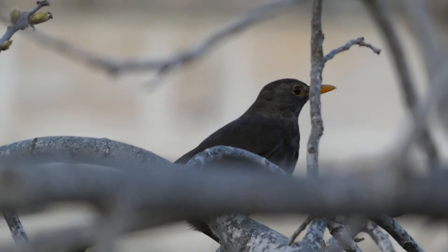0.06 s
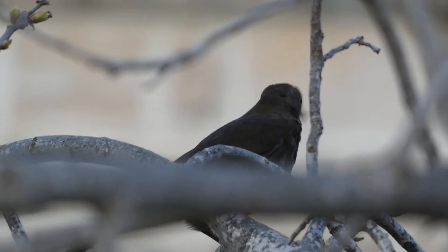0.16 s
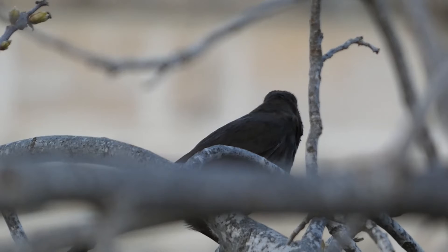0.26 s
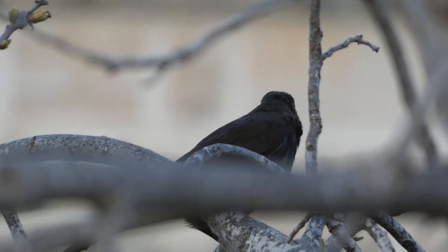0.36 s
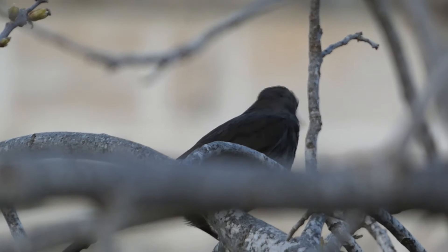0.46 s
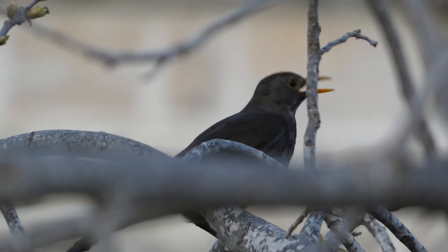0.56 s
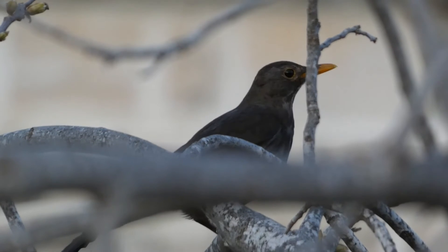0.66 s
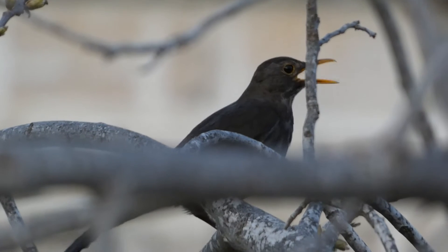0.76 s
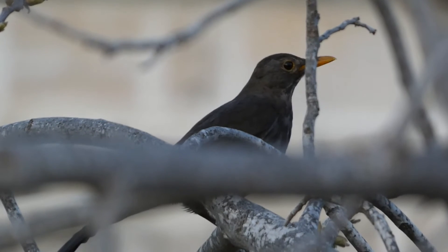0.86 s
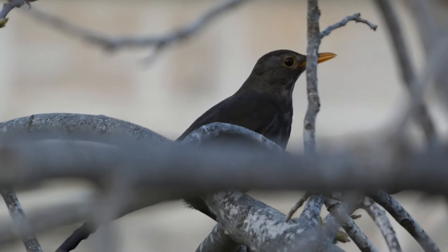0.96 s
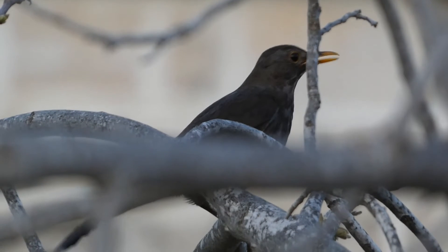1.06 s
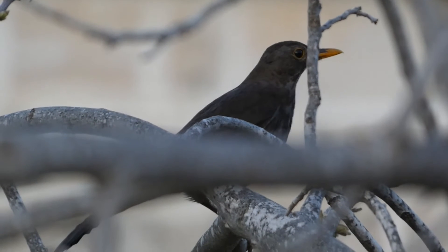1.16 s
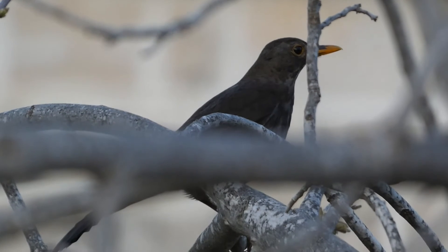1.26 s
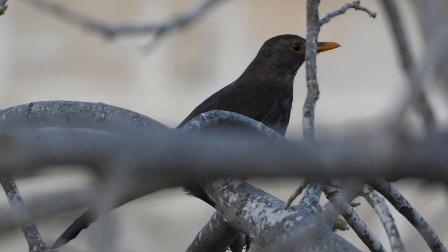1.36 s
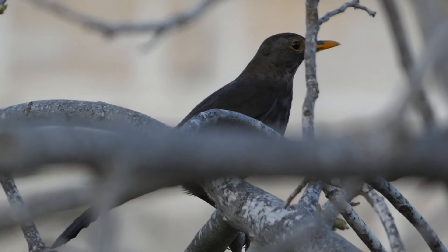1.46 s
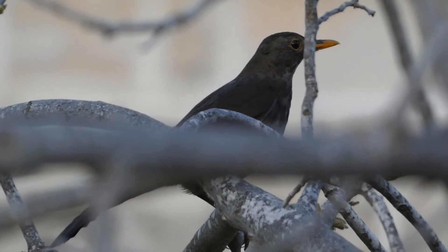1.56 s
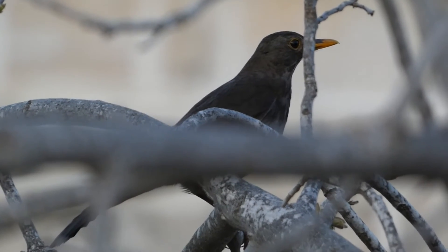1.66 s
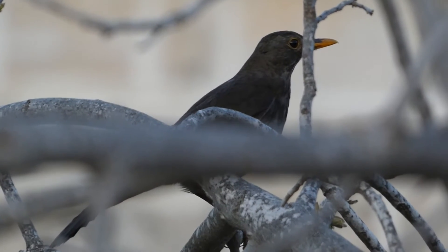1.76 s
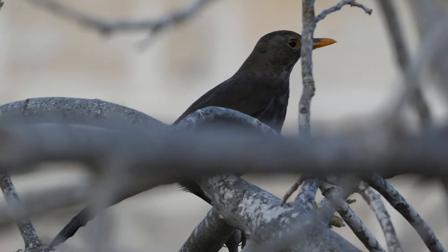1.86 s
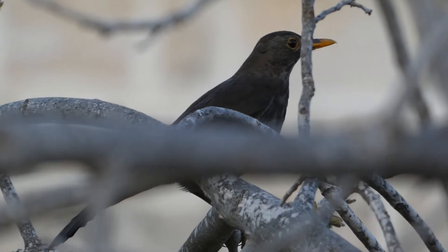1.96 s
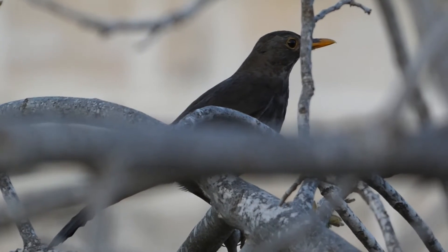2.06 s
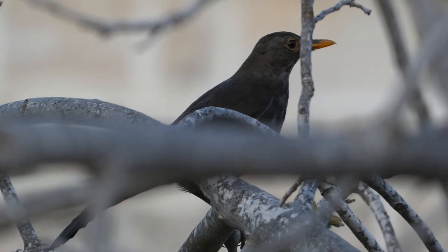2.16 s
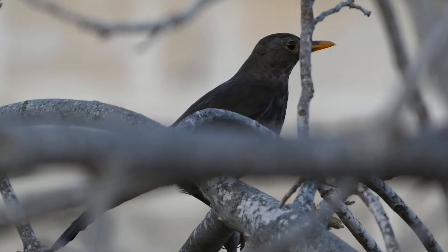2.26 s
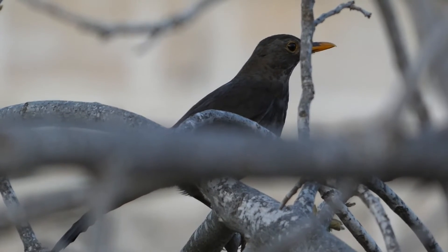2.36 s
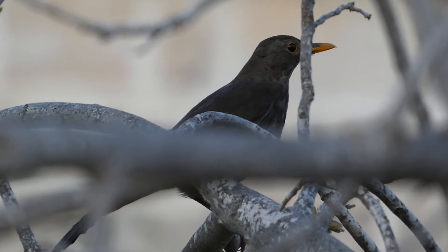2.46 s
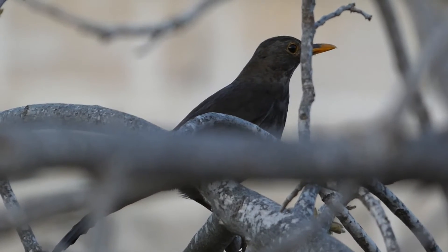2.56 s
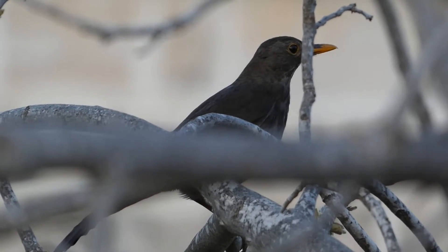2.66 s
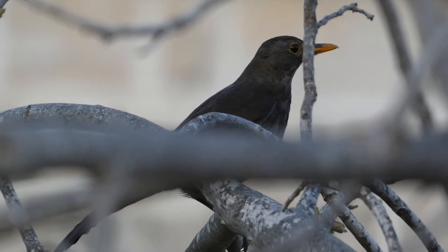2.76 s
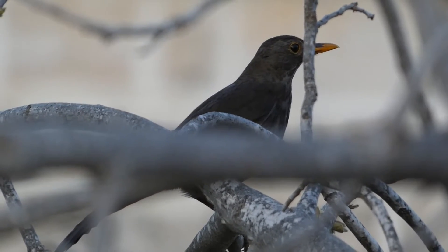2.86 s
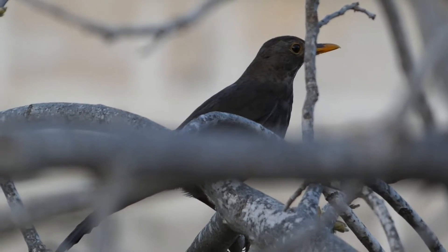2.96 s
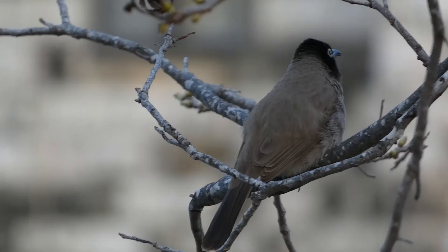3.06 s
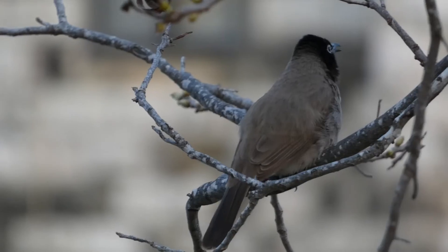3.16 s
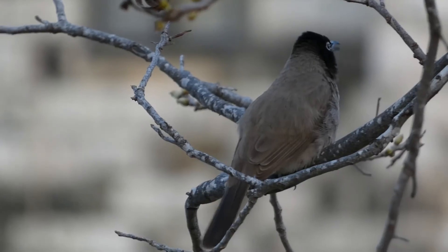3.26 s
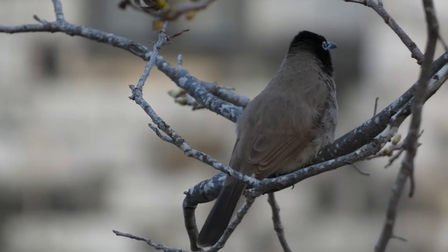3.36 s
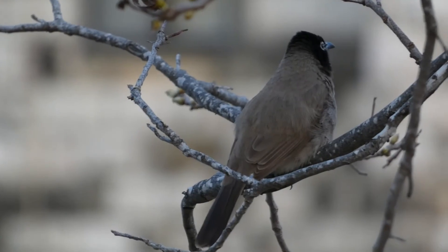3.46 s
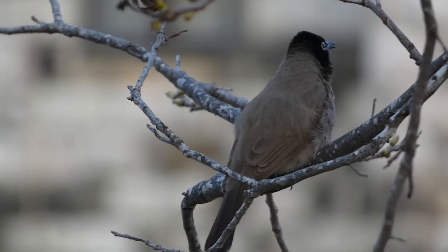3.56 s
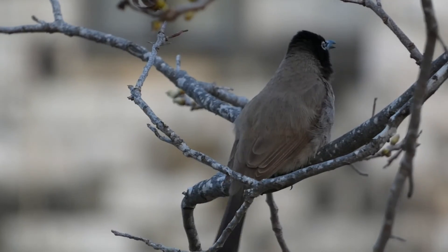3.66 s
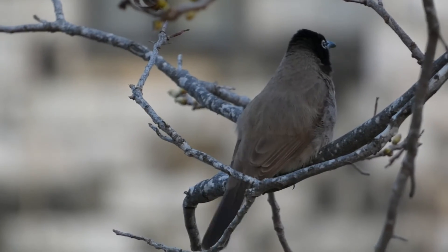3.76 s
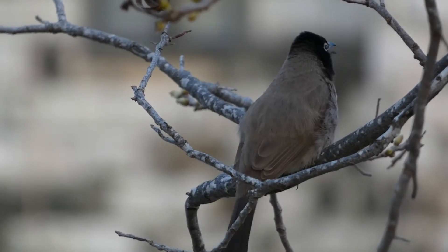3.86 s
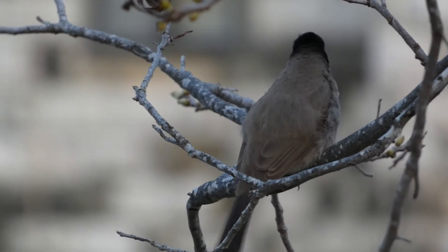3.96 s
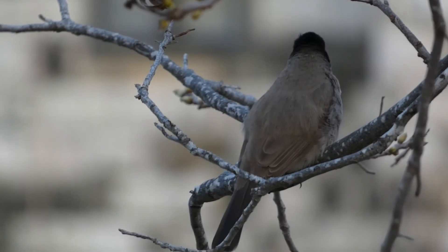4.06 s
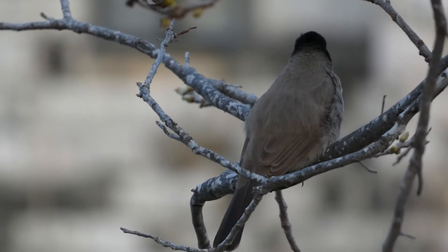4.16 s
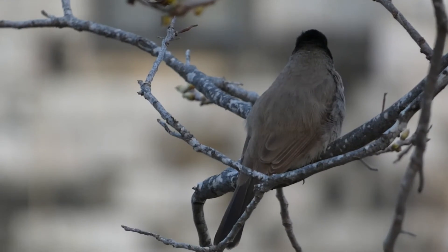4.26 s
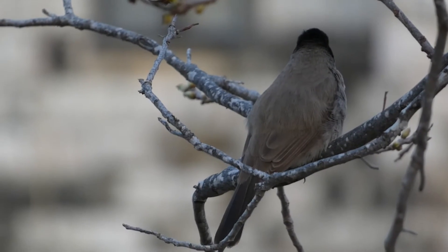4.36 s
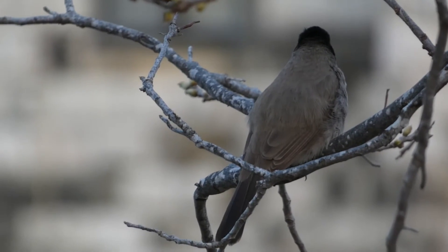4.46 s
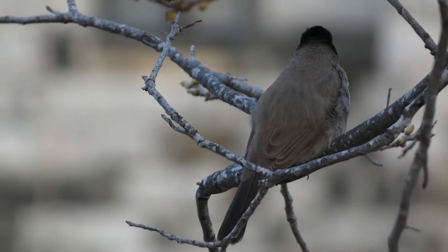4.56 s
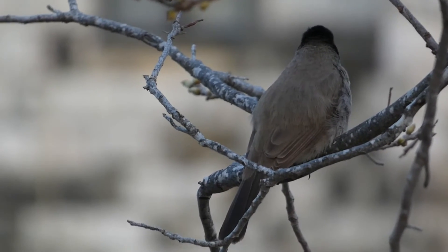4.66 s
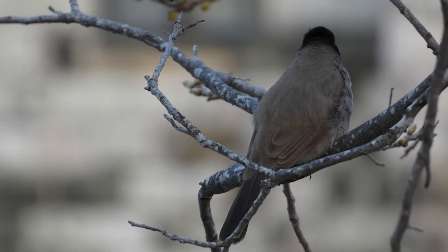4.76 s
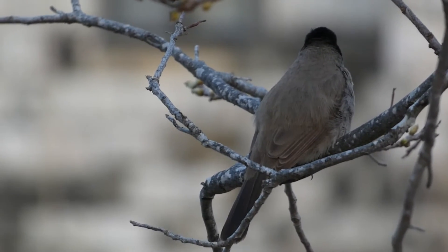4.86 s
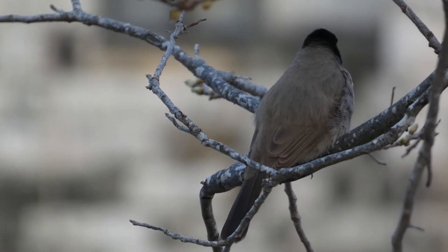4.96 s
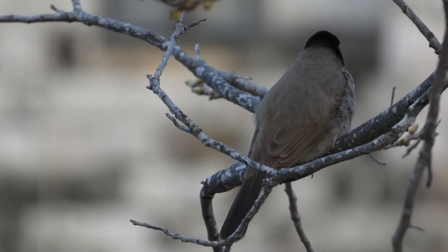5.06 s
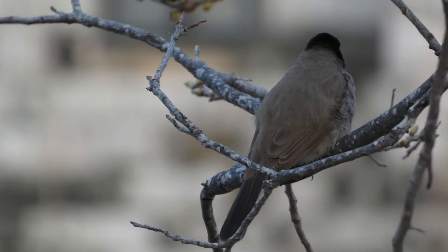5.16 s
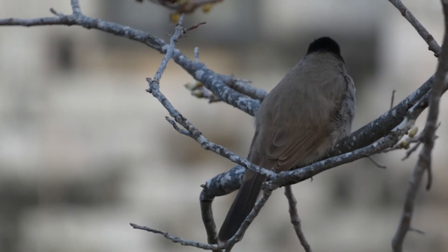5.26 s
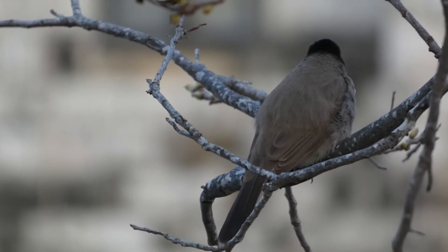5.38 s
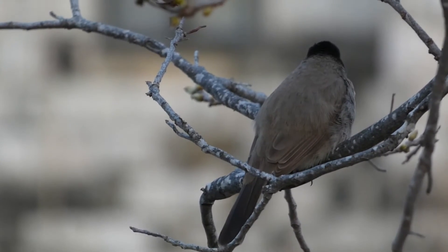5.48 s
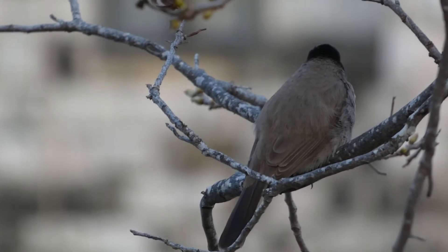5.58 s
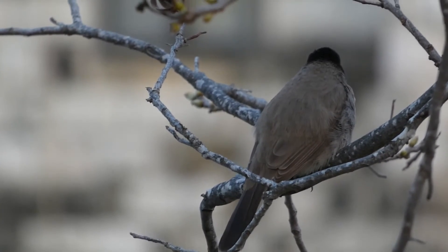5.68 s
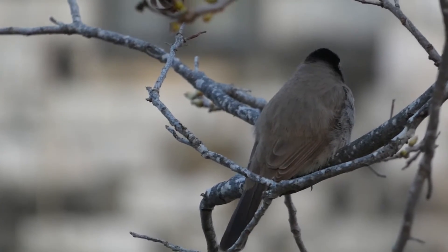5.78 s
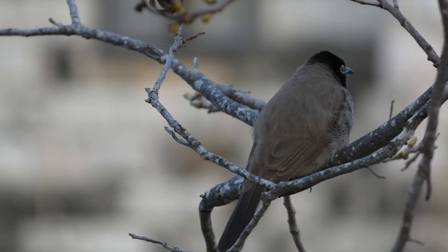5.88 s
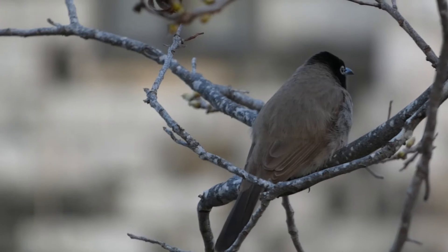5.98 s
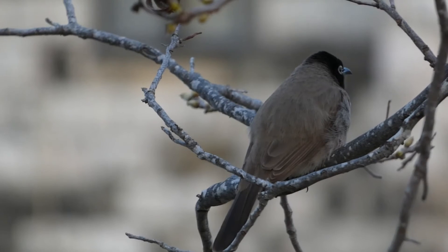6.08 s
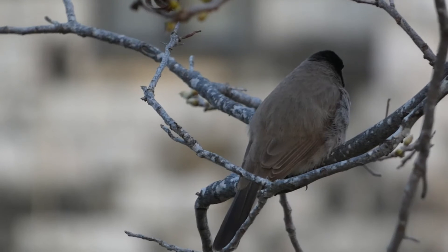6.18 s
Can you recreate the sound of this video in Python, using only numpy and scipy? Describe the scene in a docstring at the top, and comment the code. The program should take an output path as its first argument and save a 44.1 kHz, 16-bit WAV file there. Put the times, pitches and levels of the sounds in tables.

```python
"""Bare trees between stone houses. A blackbird gives three sharp two-voiced calls, then a bulbul sings three
fluty, trilled syllables; sparrows chirp and small birds whistle further off, over hiss and distant traffic.
Voices are rotating phasors shaken by smooth noise, with overtones from their powers and products.
Noise impulse responses echo the birds off the walls; air and road are shaped noise, the engine a shaken tone."""
import sys
import numpy as np
from scipy import signal
from scipy.fft import rfft, irfft
from scipy.io import wavfile
from scipy.ndimage import map_coordinates

SR = 44100
rng = np.random.default_rng(int(sys.argv[2]) if len(sys.argv) > 2 else 0)


def to_wav(sig):
    """Store sig (one row per channel, or 1-D mono) as 16-bit WAV at the path in sys.argv[1].

    Samples outside -1..1 are clipped; the rate is SR.
    """
    pcm = np.clip(np.atleast_2d(sig), -1, 1) * 32767
    pcm = np.round(pcm).astype(np.int16)
    wavfile.write(sys.argv[1], SR, pcm.T)  # frames by channels


N = 274302
T = np.arange(N) / SR


def undb(db):
    """Decibels to amplitude gain."""
    return 10 ** (np.asarray(db) / 20)


def unit(x):
    """Scale to rms 1."""
    return x / np.sqrt(np.mean(x ** 2))


def curves(rows, x):
    """Join each later column of a table by straight lines along its first column."""
    at, *columns = np.transpose(rows)
    return [np.interp(x, at, column) for column in columns]


def colour(points):
    """Gain at every FFT frequency from (Hz, dB) points, linear in dB over log frequency."""
    hz, db = np.transpose(points)
    bins_hz = np.fft.rfftfreq(N, 1 / SR)
    return undb(np.interp(np.log(bins_hz + 1), np.log(hz), db))


def apply_colour(x, points):
    """Zero-phase filter through (Hz, dB) points."""
    return irfft(rfft(x) * colour(points), N)


def noise(points):
    """Gaussian noise with a spectrum of (Hz, dB) points, rms 1."""
    return unit(apply_colour(rng.standard_normal(N), points))


def wander(points_per_s, size):
    """Smooth random motion with a spread near 1: a spline over random points."""
    at = np.arange(size) * points_per_s / SR
    return map_coordinates(rng.standard_normal(int(at[-1]) + 2), [at], order=2, mode="nearest")


def bell(t_s, spread_s):
    """Gaussian pulse with peak 1."""
    return np.exp(-.5 * (t_s / spread_s) ** 2)


def span(rows):
    """Sample numbers of a note and a gate that opens in 2 ms and closes in 6 ms."""
    times_s = np.transpose(rows)[0]
    first = max(int(times_s.min() * SR), 0)
    i = np.arange(first, min(int((times_s.max() + .003) * SR), N))
    edge = np.minimum((i - i[0]) / .002, (i[-1] - i) / .006) / SR
    return i, np.sin(np.pi / 2 * np.minimum(edge, 1)) ** 2


def rough_phasor(hz, rasp, rasp_hz=1300, waver=0.0043):
    """One vibrating source as a rotating phasor; waver unsteadies its pitch, rasp its size and phase."""
    size = len(hz)
    phase = 2 * np.pi * np.cumsum(hz * (1 + waver * wander(303.5, size))) / SR
    shake = (wander(rasp_hz, size) + 1j * wander(rasp_hz, size)) / np.sqrt(2)
    return np.exp(1j * phase) * (1 + rasp * shake) / np.sqrt(1 + rasp ** 2)


def add(out, rows, rasp, octave_db):
    """Add a whistled note of (s, Hz, dB) rows; squaring its phasor gives the octave."""
    i, gate = span(rows)
    hz, db = curves(rows, T[i])
    z = rough_phasor(hz, rasp)
    out[i] += np.sqrt(2) * gate * undb(db) * (z + undb(octave_db) * z ** 2)


def slurs(rows, rasp, edge_db, bend=0., waver=.004):
    """Notes that slide in pitch, swell and fade; bend arches the slide, waver unsteadies it."""
    out = np.zeros(N, complex)
    u = np.linspace(-1, 1)
    for start_s, length_s, start_hz, end_hz, db in rows:
        hz = start_hz + (end_hz - start_hz) * ((u + 1) / 2 + bend * (1 - u ** 2))
        hz = hz * (1 + waver * rng.standard_normal(len(u)))
        add(out, np.transpose([start_s + length_s * (u + 1) / 2, hz, db + edge_db * u ** 2]), rasp, -40)
    return out.real


def yard(x, tail_db, flutter_db, t60_s=1.0, flutter_t60_s=0.32, treble_hz=6500, treble_t60_s=0.3):
    """Direct sound, wall echoes, a quick scatter from the branches and a longer tail between the houses."""
    # Echoes from the nearest walls. Each row: delay in seconds, level in dB.
    walls = [(0.0134, -12.5), (.021, -20.5), (.039, -22), (.053, -22), (.098, -28)]
    t = T[:SR]
    width = .3

    def decay(t60):
        envelope = np.exp(-np.log(1000) * t / t60) * np.clip(t / 0.01 - .5, 0, 1)
        return unit(envelope) / np.sqrt(SR)

    envelope = np.hypot(undb(tail_db) * decay(t60_s), undb(flutter_db) * decay(flutter_t60_s))
    echoes = rng.standard_normal((2, SR)) * envelope
    for delay_s, db in walls:
        echoes[0, int(delay_s * SR)] += undb(db)
    # air soaks up the treble along the longer paths
    dull = signal.sosfiltfilt(signal.butter(2, treble_hz, fs=SR, output="sos"), echoes)
    mid, side = dull + (echoes - dull) * np.exp(-np.log(1000) * t / treble_t60_s)
    mid[0] += 1  # direct sound
    return np.array([signal.fftconvolve(x, mid + sign * width * side)[:N] for sign in (1, -1)])


def air(level_db=-56.5):
    """Low town rumble and soft hiss: shaped noise, partly alike in both ears."""
    # Outdoor air spectrum. Each row: frequency in Hz, relative density in dB.
    air_spectrum = [(15, -56), (25, -21), (113, 1), (204, -1), (267, -3), (349, -7.5), (433, -8), (614, -9),
                    (826, -9.5), (1710, -17.5), (2850, -18.5), (4380, -21.5), (6050, -24), (9050, -27.5),
                    (15500, -25)]
    # Likeness of the two ears. Each row: frequency in Hz, side minus mid in dB.
    side_gain = [(30, 2), (60, -7.5), (250, -2), (500, -1), (1500, 2), (4000, 9), (12000, -2)]
    # Slow change of the town's loudness. Each row: time in seconds, gain in dB.
    town_swell = [(0, 0), (3.0, 0), (3.3, 1.5), (4.5, 1), (6.2, 0.5)]
    mid = noise(air_spectrum)
    side = apply_colour(noise(air_spectrum), side_gain)
    return np.array([mid + side, mid - side]) * undb(level_db + curves(town_swell, T)[0])


def traffic(rumble_gain_db=-1, width=0.16, drone_hz=255.6):
    """A far engine, a randomly shaken tone, drones in swells over a rumble of road noise."""
    # Engine swells. Each row: peak time in seconds, Gaussian spread in seconds, peak level in dB.
    drone_swells = [(1.32, 0.024, -53), (3.45, .04, -58), (4.68, 0.081, -48), (5.013, 0.028, -50.5),
                    (5.498, 0.12, -51), (5.807, .035, -51)]
    # Road rumble. Each row: time in seconds, level in dB ahead of rumble_gain_db.
    rumble = [(0, -77), (3.0, -78), (3.4, -62), (4.45, -56.5), (4.56, -51.5), (4.8, -56), (6.22, -58)]
    swell = sum(undb(db) * bell(T - peak_s, spread_s) for peak_s, spread_s, db in drone_swells)
    drone = np.sqrt(2) * rough_phasor(np.full(N, drone_hz), 0.71, rasp_hz=34.8).real * swell
    road = [(100, -49), (220, -1.0), (370, 1.5), (470, -1), (600, -20.5), (1200, -12.5), (2500, -27.5),
            (6000, -54.5)]
    mid, side = noise(road), width * noise(road)
    return drone + undb(curves(rumble, T)[0] + rumble_gain_db) * np.array([mid + side, mid - side])


def chatter(count=420, centre_hz=3750, spread=.18, slur=.12, length_s=.04, scatter_db=2, edge_db=-9):
    """Sparrows in the far hedges: many faint slurred chips at random times and pitches blur into a wash."""
    # Level of the wash. Each row: time in seconds, level in dB.
    wash_level = [(0, -64), (1.8, -64.5), (2.5, -73), (3.1, -70.5), (3.6, -66), (4.9, -62.5), (6.22, -66)]
    out = np.zeros(N, complex)
    starts_s = (np.arange(count) + rng.random(count)) / count * (T[-1] - length_s)
    draws = np.clip(rng.standard_normal((count, 4)), -2, 2)
    for start_s, (pitch, rise, fall, size) in zip(starts_s, draws):
        hz, db = centre_hz * np.exp(spread * pitch), scatter_db * size
        chip = [(start_s, hz * np.exp(slur * rise), db + edge_db),
                (start_s + length_s / 2, hz, db),
                (start_s + length_s, hz * np.exp(slur * fall), db + edge_db)]
        add(out, chip, .9, -40)
    return unit(out.real) * undb(curves(wash_level, T)[0])


def far_whistles():
    """Thin, slightly wavering whistles from further trees: slow pitch slides."""
    # Each row: start in seconds, length in seconds, start pitch in Hz, end pitch in Hz, peak level in dB.
    whistles = [(1.455, .05, 6430, 6350, -64), (3.05, .11, 5240, 5650, -62.5), (3.78, .14, 5000, 5750, -67),
                (3.79, 0.082, 4060, 4050, -57), (3.88, 0.16, 6190, 6170, -61.5),
                (4.08, 0.091, 4030, 3980, -53.5), (4.17, 0.13, 6090, 6100, -59.5),
                (4.23, .18, 2910, 2450, -64), (4.385, 0.1, 5020, 4995, -59.5), (4.46, .2, 3255, 3140, -58),
                (4.82, .16, 8060, 7970, -65), (5.06, .17, 7970, 7920, -60), (5.45, .13, 5700, 5585, -65.5)]
    return slurs(whistles, rasp=.12, edge_db=-4.5)


def far_chips():
    """Short husky chips from further trees: arched slides, strongly shaken."""
    # Each row: start in seconds, length in seconds, start pitch in Hz, end pitch in Hz, peak level in dB.
    chips = [(.22, .062, 9300, 8850, -68), (.779, .02, 5150, 5700, -54.5),
             (1.261, 0.026, 5480, 5750, -53.5), (1.657, .025, 5500, 6050, -58),
             (1.745, .035, 5100, 5700, -59), (2.705, 0.05, 2900, 3290, -58), (2.722, .035, 3880, 4020, -59),
             (2.885, .04, 3550, 3350, -60), (3.865, 0.055, 3610, 4090, -55), (4.285, .022, 6000, 5300, -57),
             (4.548, .13, 5270, 5700, -63.5), (4.6, .13, 3050, 2204, -65), (4.68, 0.057, 5660, 4900, -56),
             (4.87, .058, 5090, 4970, -62), (5.405, 0.038, 3620, 3525, -57), (5.458, .023, 4220, 3270, -56),
             (5.505, .026, 4045, 3684, -51.5), (5.542, 0.0155, 3610, 3960, -55),
             (5.802, .024, 3565, 2890, -58)]
    return slurs(chips, rasp=.45, edge_db=-4.5, bend=.15)


def cheeps(rasp=1.0, rise_s=.008, fall_s=.02, length_s=0.076, base_hz=3280, fade_db=-5.5):
    """Far sparrows' hoarse cheeps leap to their top and sink back as they fade."""
    # Each row: time of the top in seconds, top pitch in Hz, level at the top in dB.
    cheep_tops = [(4.151, 5300, -47.5), (5.138, 5230, -52), (5.933, 5000, -49)]
    out = np.zeros(N, complex)
    t = np.linspace(-rise_s, length_s)
    for top_s, top_hz, db in cheep_tops:
        hz = base_hz + (top_hz - base_hz) * np.exp(-abs(t) / np.where(t < 0, rise_s, fall_s))
        add(out, np.transpose([top_s + t, hz, db + fade_db * t / length_s]), rasp, -40)
    return out.real


def pips(first_s=5.652, gap_s=.1, length_s=.022, start_hz=6220, end_hz=5920, first_db=-55, step_db=-.9):
    """A small bird's even run of six falling pips, each fainter than the last."""
    rows = [(first_s + k * gap_s, length_s, start_hz, end_hz, first_db + k * step_db) for k in range(6)]
    return slurs(rows, rasp=.2, edge_db=-3)


def near_sparrows(rasp=0.14, octave_db=-29):
    """Sparrows on the nearby branches: a held note swells, dips, flicks up and falls away."""
    # Each row: dip time in seconds, held length in seconds, held pitch in Hz, dip pitch in Hz,
    # flick pitch in Hz, rise time of the flick in seconds, level at the flick in dB.
    chirps = [(0.559, .068, 3650, 2610, 4170, 0.0091, -45.5), (1.895, .038, 3550, 3000, 3670, 0.014, -38),
              (2.136, .050, 3840, 2542, 4190, .010, -38)]
    dip_fade_s, chirp_end_hz = .008, 2500
    scoop_hz, scoop_s = 400, 0.00797  # upward slide into the held note
    open_s = .014  # the held note opens this fast, then swells slowly
    levels_db = [-19, -6, -1, -9, 0, -17]  # start, open, held, dip, flick, end; relative to the flick
    out = np.zeros(N, complex)
    for dip_s, held_s, held_hz, dip_hz, flick_hz, flick_s, db in chirps:
        end_s = 3 * flick_s
        t = np.linspace(-held_s, end_s)
        held = held_hz + (dip_hz - held_hz) * np.exp(-abs(t) / dip_fade_s)
        held -= scoop_hz * np.exp(-(t + held_s) / scoop_s)
        flick = np.interp(t, [0, flick_s, 2 * flick_s, end_s],
                          [dip_hz, flick_hz, (dip_hz + flick_hz) / 2 - 250, chirp_end_hz])
        shape_db = np.interp(t, [-held_s, open_s - held_s, -dip_fade_s, 0, flick_s, end_s], levels_db)
        add(out, np.transpose([dip_s + t, np.where(t < 0, held, flick), db + shape_db]), rasp, octave_db)
    return out.real


def bulbul_squeaks():
    """Squeaks that lead into the bulbul's syllables: short downward slides."""
    # Each row: start in seconds, length in seconds, start pitch in Hz, end pitch in Hz, peak level in dB.
    squeaks = [(3.149, .027, 6200, 4650, -53), (3.149, .026, 9500, 7650, -51),
               (3.145, .04, 3500, 2900, -55), (3.175, .021, 4850, 3850, -41),
               (3.184, .015, 9200, 5900, -39.5), (3.214, 0.027, 5000, 3860, -45),
               (3.246, 0.019, 6200, 5760, -43), (3.906, 0.0141, 2857, 1705, -31)]
    return slurs(squeaks, rasp=.2, edge_db=-6, bend=.12, waver=.005)


def bulbul_rasps():
    """Chaotic bursts of the syrinx: a pitch shaken so hard that it spreads into a band."""
    # Scratchy rasps around the start of the phrase. Each row: peak time in seconds,
    # Gaussian spread in seconds, centre in Hz, nominal half width in Hz, peak level in dB.
    bursts = [(3.169, 0.012, 8500, 1500, -52), (3.193, 0.0055, 7000, 1800, -40.5),
              (3.256, .006, 5600, 710, -40), (3.251, 0.0042, 8100, 1500, -49),
              (3.295, 0.041, 3600, 540, -49), (3.337, 0.0049, 4200, 1104, -38),
              (3.356, 0.0041, 3000, 920, -44.5), (3.336, 0.015, 6500, 2200, -58)]
    out = np.zeros(N)
    for peak_s, spread_s, centre_hz, half_width_hz, db in bursts:
        i, gate = span([(peak_s - 3 * spread_s,), (peak_s + 3 * spread_s,)])
        voice = rough_phasor(np.full(len(i), float(centre_hz)), 4.1, rasp_hz=2 * half_width_hz).real
        out[i] += unit(voice) * gate * undb(db) * bell(T[i] - peak_s, spread_s)
    return out


def bulbul(doubling_db=-6, hiss_db=-44, brighten=0.26, full_voice_db=-25, throb_hz=480, tremor_db=1.1):
    """Fluty syllables start hoarse, clear and end in a trill that swings pitch and level together."""
    # One list per syllable. Each row: time in seconds, pitch in Hz, level in dB.
    syllables = [
        [(3.215, 2321, -48.5), (3.227, 2076, -34), (3.237, 1770, -33), (3.249, 1845, -30.5),
         (3.263, 2030, -24.5), (3.301, 2029, -25), (3.311, 2230, -29.5), (3.321, 2286, -28),
         (3.331, 2262, -24.5), (3.347, 1960, -20), (3.361, 2020, -22), (3.366, 1920, -28.5)],
        [(3.597, 1548, -41), (3.613, 1424, -35.5), (3.633, 1822, -35.5), (3.643, 1800, -35.5),
         (3.653, 1684, -30.5), (3.713, 1687, -33), (3.723, 1651, -39), (3.737, 1653, -27.5), (3.751, 1597, -26),
         (3.763, 1853, -26), (3.793, 1725, -23.5), (3.806, 1775, -30.5)],
        [(3.916, 1725, -34), (3.92, 1726, -34.5), (3.934, 2122, -30.5), (3.944, 2239, -32.5), (3.95, 2500, -20),
         (3.962, 2530, -21.5), (3.99, 2458, -17.5), (4.002, 2590, -22), (4.018, 2587, -18.5),
         (4.024, 2666, -18), (4.038, 2620, -19), (4.044, 2566, -26.5)],
    ]
    # One row per syllable: hoarse length in seconds, hoarse roughness (0-1), trill start in seconds,
    # trill rate in Hz, greatest trill depth in Hz.
    delivery = [(.04, .25, 3.290, 219, 140), (.04, 0.2, 3.755, 113, 135), (.032, 0.63, 3.990, 165.4, 175)]
    # Throat and beak. Each row: frequency in Hz, gain on the overtones in dB.
    throat = [(3000, -35), (5200, -42), (6500, -51.5), (8500, -58), (10800, -46), (12500, -54.5),
              (16000, -58)]
    clear_roughness, change_s = 0.069, 0.0062  # clear voice; time taken to clear
    out = np.zeros(N)
    hiss = noise([(1000, -24.5), (2000, -0.5), (4000, 8), (6000, -17.5), (8000, -20), (11000, -7), (15000, -23)])
    for rows, (hoarse_s, hoarse, trill_s, trill_hz, trill_depth_hz) in zip(syllables, delivery):
        i, gate = span(rows)
        hz, db = curves(rows, T[i])
        roughness = np.interp(T[i] - T[i[0]], [hoarse_s - change_s, hoarse_s], [hoarse, clear_roughness])
        # the trill opens out and closes again by the end of the syllable
        progress = np.interp(T[i], [trill_s, T[i[-1]]], [0, 1])
        depth_hz = trill_depth_hz * np.sin(np.pi * progress) ** .5
        swing = 2 * np.pi * np.cumsum(trill_hz * (1 + 0.026 * wander(60, len(i)))) / SR
        z = rough_phasor(hz + depth_hz * np.sin(swing), 0.82 * roughness, rasp_hz=864)
        phase = np.unwrap(np.angle(z))
        overtones = sum(undb(curves(throat, k * hz)[0]) * np.cos(k * phase) for k in range(2, 8))
        # overtones swell less than the fundamental
        overtones = overtones * undb(brighten * (full_voice_db - db))
        # where the voice is rough its period doubles: a line halfway to the octave
        doubled = undb(doubling_db) * roughness * np.cos(3 / 2 * phase)
        # loudest as the pitch rises through its centre
        throb = (1 + depth_hz / throb_hz * np.cos(swing)) * undb(tremor_db * wander(150, len(i)))
        voice = np.sqrt(2) * (z.real + overtones + doubled) + undb(hiss_db) * hiss[i]
        out[i] += gate * undb(db) * throb * voice
    return out


def blackbird_voices(rasp=0.034):
    """The two sides of the syrinx as complex tones, and the envelope of the scrape that starts each call."""
    # Each row: crest time in seconds, length after it in seconds, crest pitch in Hz, settled pitch in Hz,
    # upper voice pitch in Hz, crest level in dB, peak level in dB, upper voice level in dB.
    calls = [(.654, .028, 4870, 4860, 6640, -37, -26, -35),
             (.845, 0.037, 5590, 5020, 6770, -24, -19.5, -29),
             (1.101, 0.0343, 5570, 4880, 6720, -24.5, -19, -31.5)]
    # lower voice: shoots up to its crest, then sags and droops while it swells and fades
    upsweep_s, upsweep_hz_per_s, sag_s, droop_hz_per_s = .009, 200000, 0.01286, 3430
    attack_db, swell_s, fade_db = -9, 0.018, -6.5
    # upper voice: splits off before the crest, climbs, wobbles and lingers
    split_s, linger_s, climb_hz, climb_s = .003, .002, 850, .0045
    wobble_rate_hz, wobble_depth_hz = 51, 95
    scrape_lead_s, scrape_spread_s = 0.0059, .0045
    low, high, onset = np.zeros(N, complex), np.zeros(N, complex), np.zeros(N)
    for crest_s, length_s, crest_hz, settled_hz, upper_hz, crest_db, peak_db, upper_db in calls:
        t = np.linspace(-upsweep_s, length_s)
        sag = settled_hz + (crest_hz - settled_hz) * np.exp(-(t / sag_s) ** 2) - droop_hz_per_s * t
        hz = np.where(t < 0, crest_hz + upsweep_hz_per_s * t, sag)
        db = np.interp(t, [-upsweep_s, 0, swell_s, length_s],
                       [crest_db + attack_db, crest_db, peak_db, peak_db + fade_db])
        add(low, np.transpose([crest_s + t, hz, db]), rasp, -45)
        t = np.linspace(-split_s, length_s + linger_s)
        hz = upper_hz - climb_hz * np.exp(-t / climb_s)
        hz -= wobble_depth_hz * np.cos(2 * np.pi * wobble_rate_hz * t)
        add(high, np.transpose([crest_s + t, hz, np.full_like(t, upper_db)]), rasp, -45)
        onset += undb(peak_db) * bell(T - crest_s + scrape_lead_s, scrape_spread_s)
    return low, high, onset


def blackbird(sum_db=10, low_octave_db=-6, high_octave_db=2, triple_db=-1, cross_db=14,
              scrape_db=-21, hiss_db=-29):
    """Both sides of the syrinx sound at once and modulate each other; each call starts with a scrape."""
    # Open beak. Each row: frequency in Hz, gain on the overtones in dB.
    beak = [(7000, -6), (8300, 7), (9700, -6.5), (11000, 2), (12000, -3), (13300, -6), (15000, -3)]
    low, high, onset = blackbird_voices()
    # the coupled membranes add a sum tone, octaves and third-order tones
    mixed = undb(sum_db) * low * high
    mixed += undb(low_octave_db) * low ** 2 + undb(high_octave_db) * high ** 2
    mixed += undb(triple_db) * low ** 3 + undb(cross_db) * high ** 2 * low.conj()
    overtones = apply_colour(mixed.real, beak)
    turbulence = noise([(1800, -34), (2600, -6), (4200, 4.5), (6500, 1), (8500, -8.0), (12000, -11), (16000, -26)])
    breath = turbulence * (undb(scrape_db) * onset + undb(hiss_db) * abs(low))
    return (low + high).real + overtones + breath


def scene():
    """Near birds are almost dry; the further ones carry more of the yard."""
    background = air() + traffic()
    far_birds = far_whistles() + far_chips() + cheeps() + pips() + chatter()
    far = yard(far_birds, tail_db=-5.0, flutter_db=-4)
    far += yard(near_sparrows(), tail_db=-12.5, flutter_db=-25)
    phrase = bulbul_squeaks() + bulbul_rasps() + bulbul()
    near = yard(phrase, tail_db=-21, flutter_db=-24.0)
    near += yard(blackbird(), tail_db=-20.5, flutter_db=-17.5)
    return background + far + near


def record(dry, top_hz=15800):
    """A steep elliptic low-pass cuts the top."""
    return signal.sosfilt(signal.ellip(10, .2, 80, top_hz, fs=SR, output="sos"), dry)


dry = scene()
out = record(dry)
to_wav(out)
```